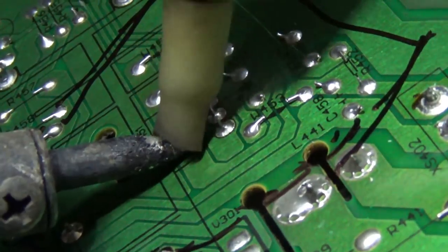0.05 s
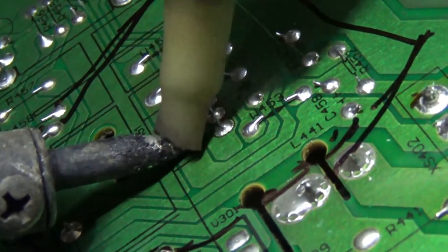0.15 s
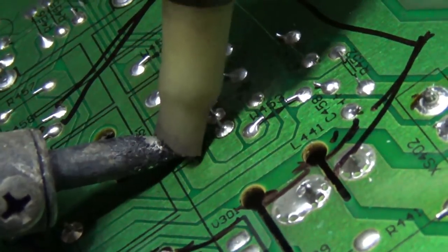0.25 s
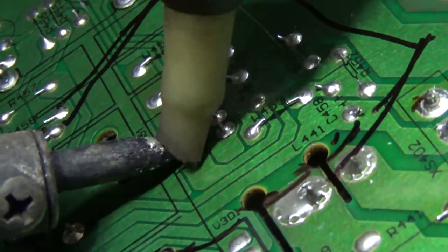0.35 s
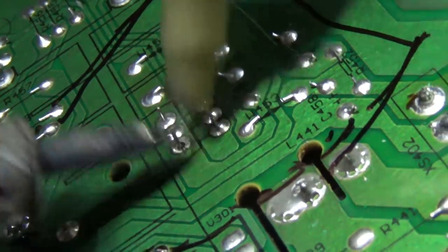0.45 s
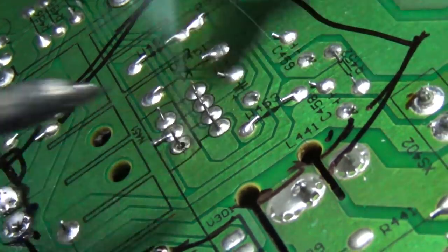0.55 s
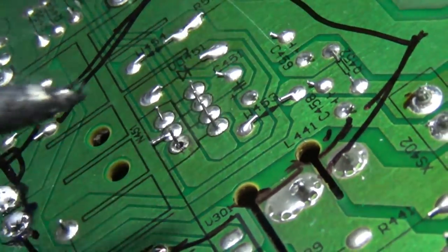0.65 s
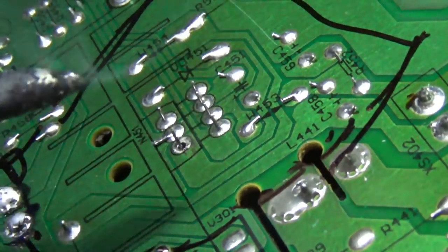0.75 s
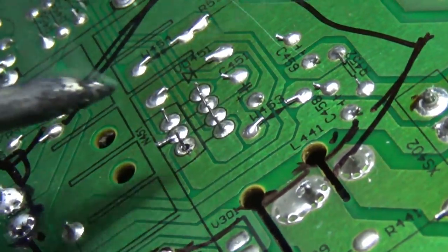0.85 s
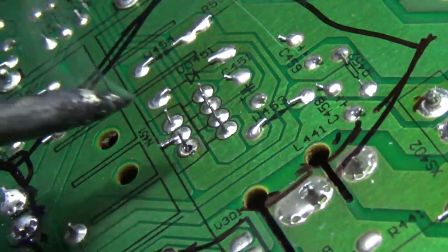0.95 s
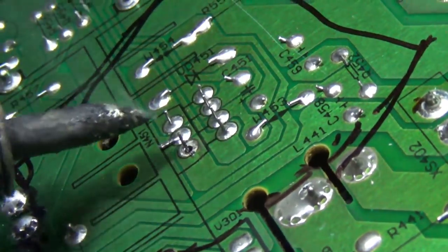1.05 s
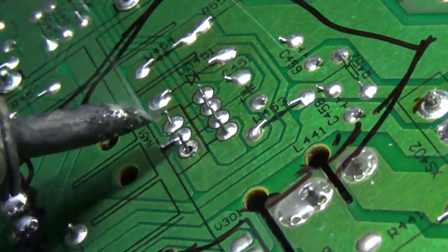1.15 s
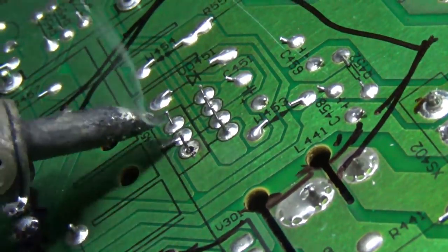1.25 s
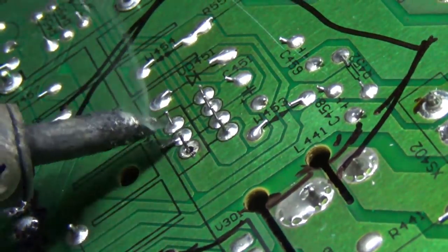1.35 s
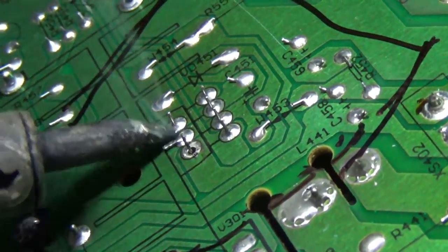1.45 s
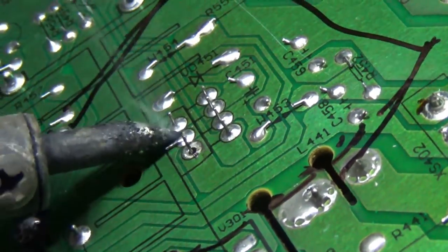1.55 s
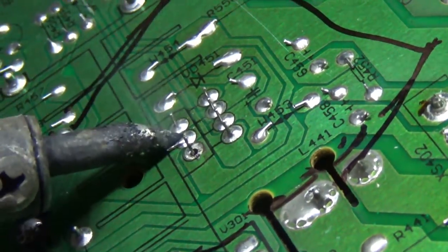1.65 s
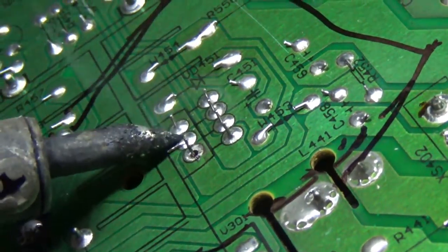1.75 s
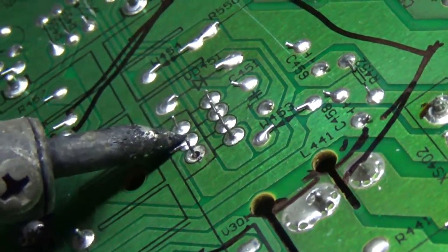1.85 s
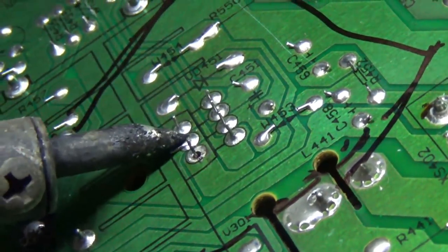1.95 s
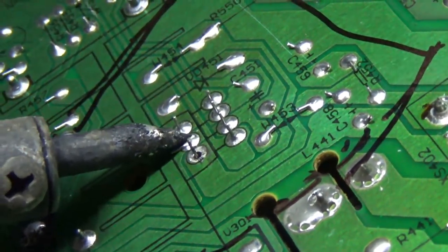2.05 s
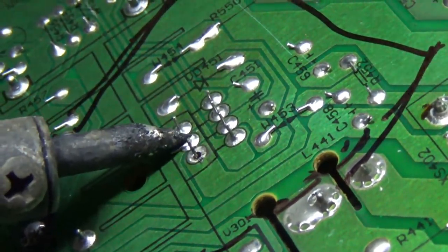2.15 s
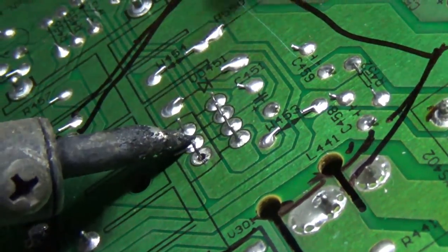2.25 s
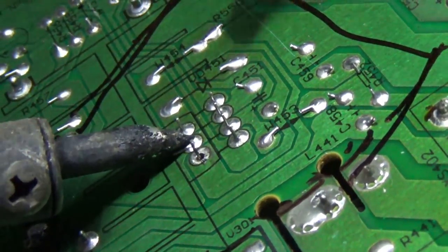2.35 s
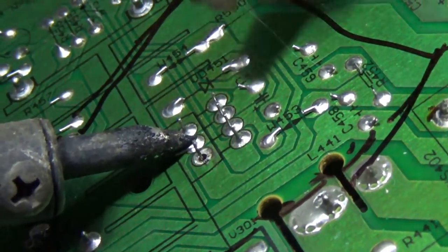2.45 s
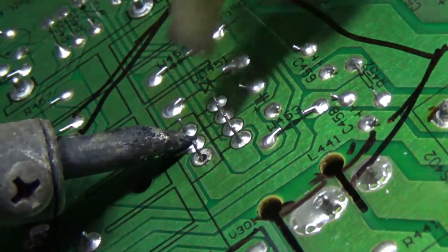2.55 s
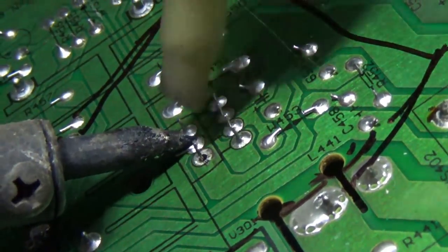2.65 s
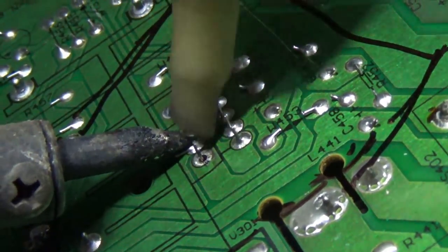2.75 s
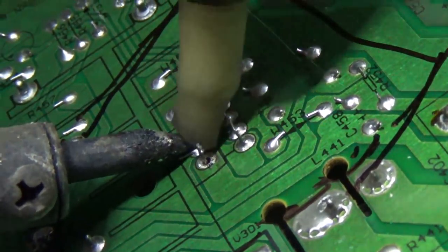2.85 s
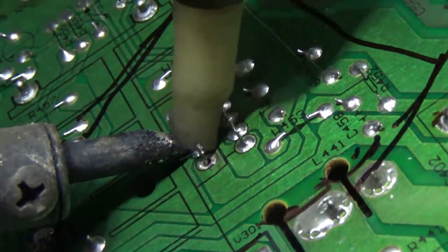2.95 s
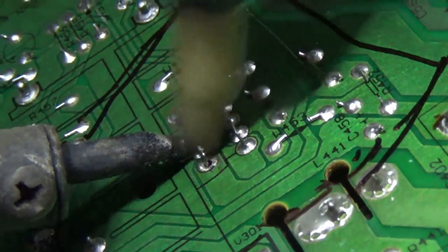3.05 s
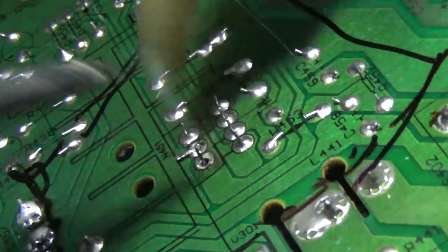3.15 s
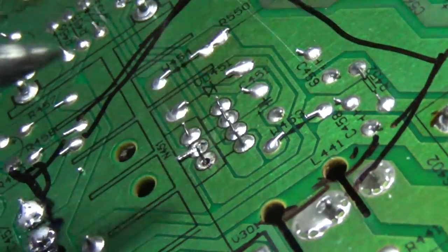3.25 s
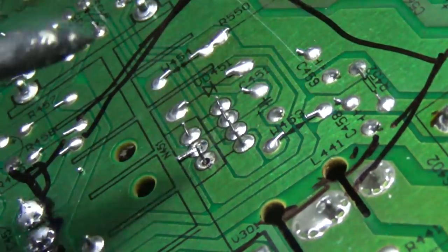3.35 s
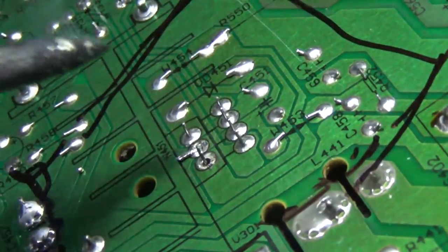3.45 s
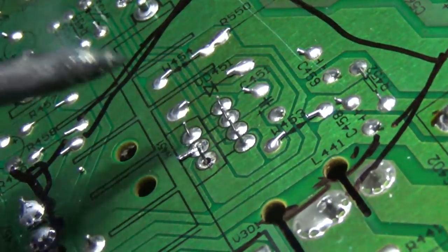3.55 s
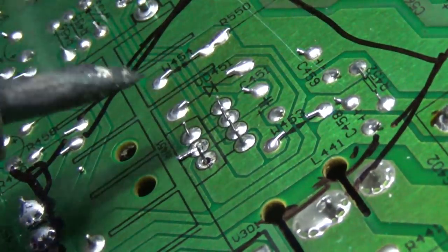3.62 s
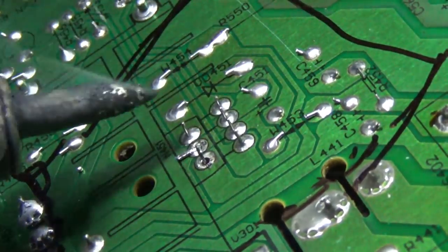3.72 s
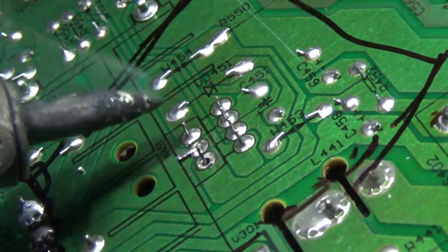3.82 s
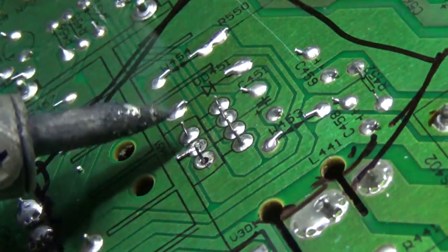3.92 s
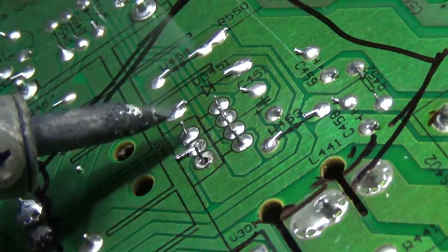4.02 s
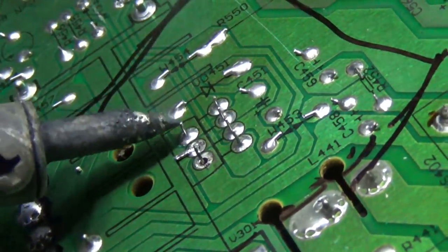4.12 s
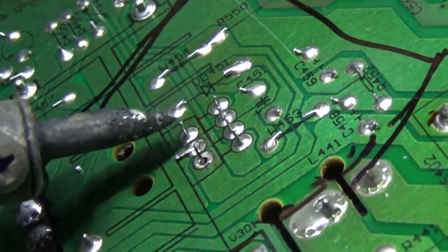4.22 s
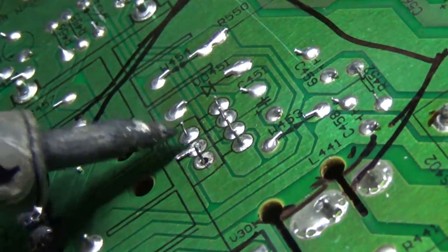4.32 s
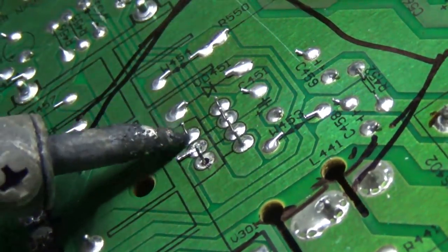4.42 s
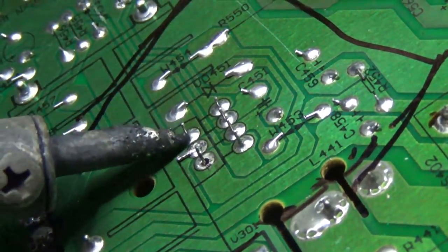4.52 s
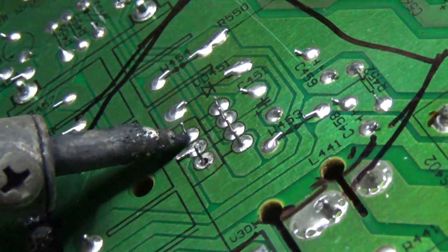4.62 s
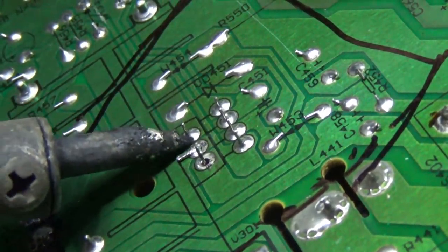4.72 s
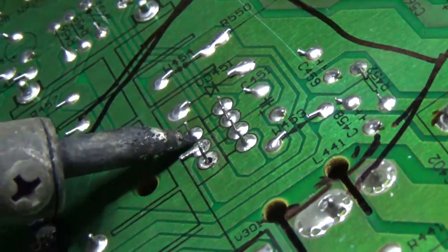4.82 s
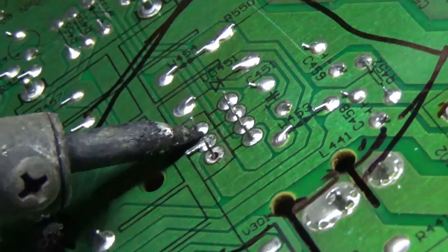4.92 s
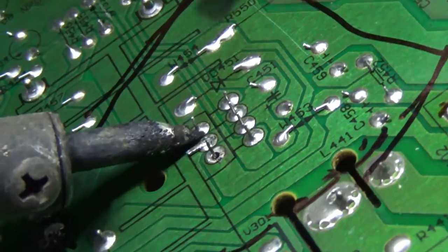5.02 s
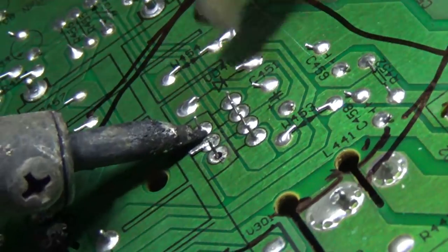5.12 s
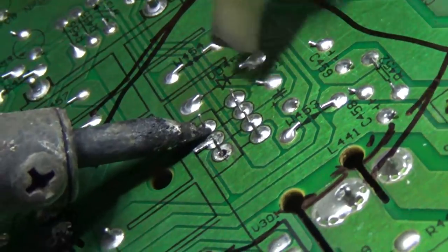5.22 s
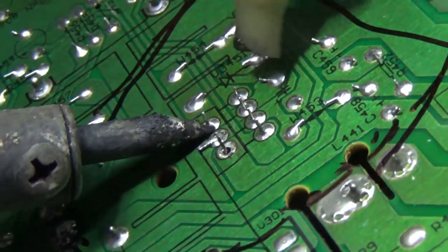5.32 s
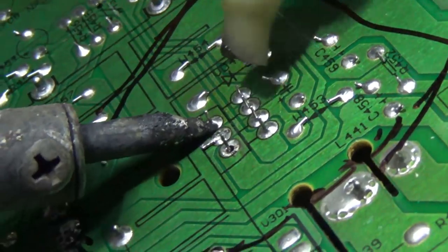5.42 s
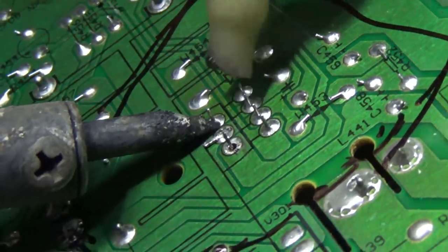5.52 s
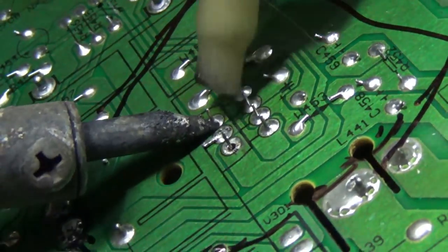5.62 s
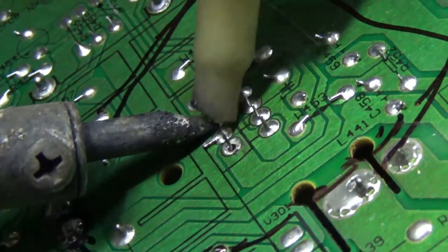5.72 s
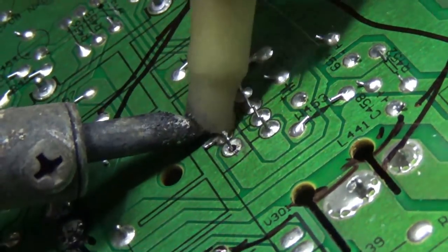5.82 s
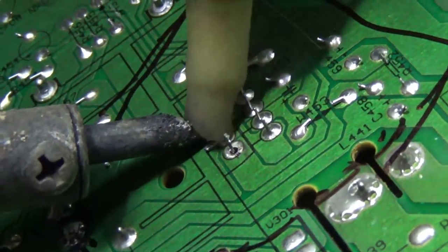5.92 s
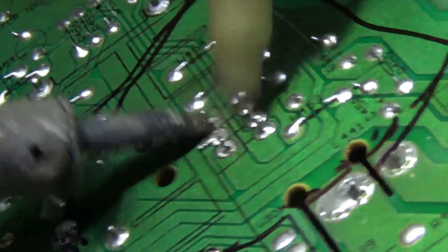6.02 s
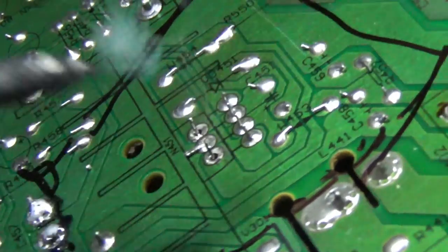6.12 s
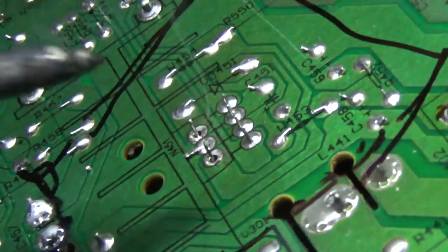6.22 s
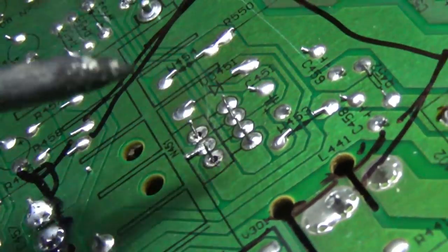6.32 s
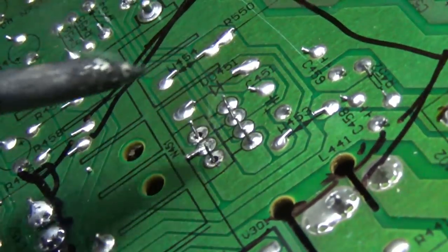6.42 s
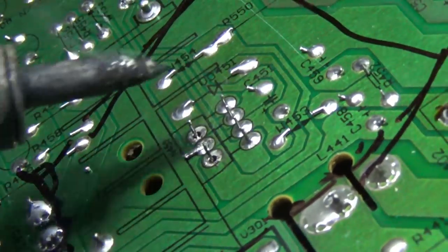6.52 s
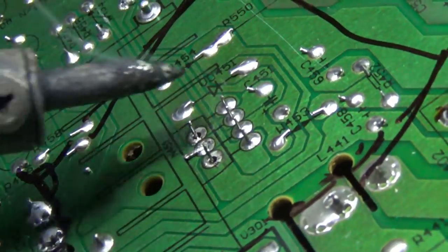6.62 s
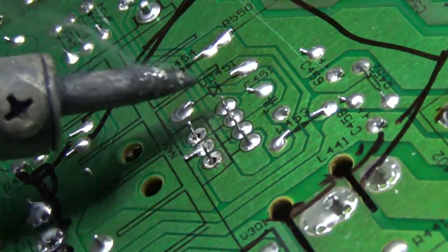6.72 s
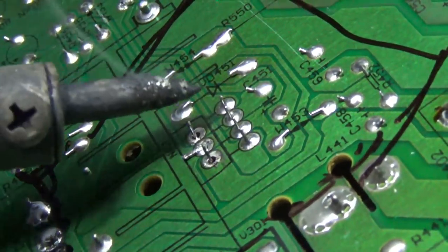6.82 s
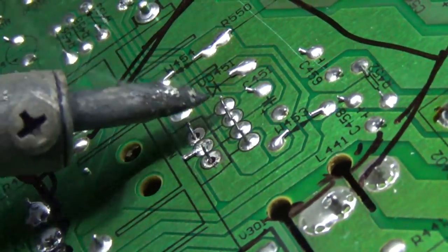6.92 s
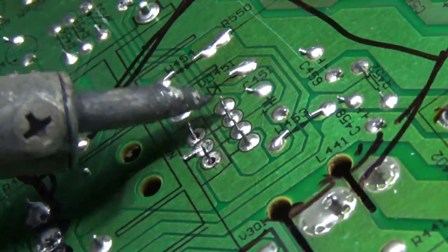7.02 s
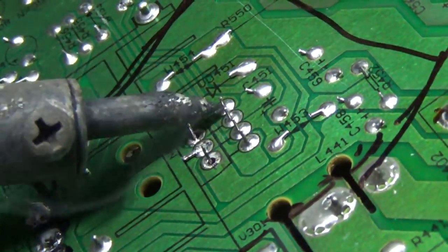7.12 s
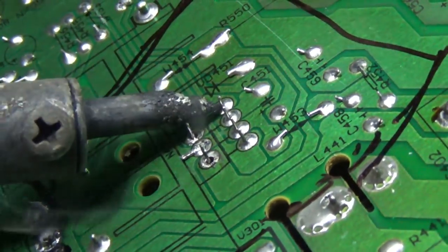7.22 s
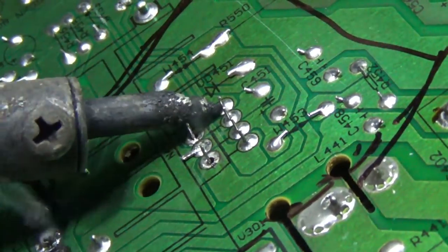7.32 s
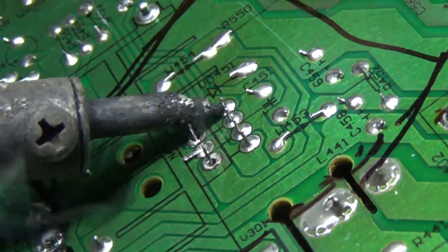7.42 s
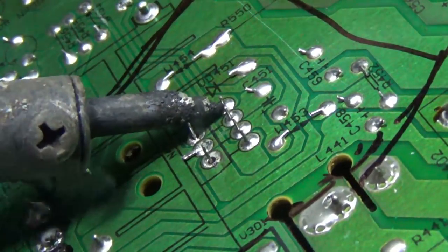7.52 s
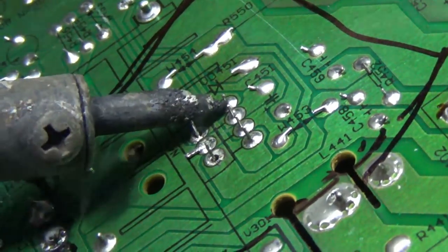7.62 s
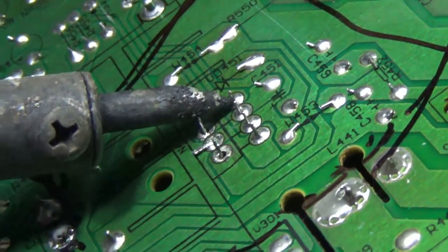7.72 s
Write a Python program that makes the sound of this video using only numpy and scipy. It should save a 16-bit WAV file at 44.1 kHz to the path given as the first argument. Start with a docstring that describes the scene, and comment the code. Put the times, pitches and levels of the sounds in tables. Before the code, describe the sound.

Close to a circuit board in a quiet, softly humming room, a spring-loaded solder pump clicks down, then fires with a very loud double snap and brief gritty shudder. A loose part bounces inside, the plunger hisses back and latches with a bright click, and the knob clicks up. This cycle happens three times, with small handling ticks between. A cricket chirps faintly and steadily in the distance. Close stereo microphone, sounds mostly centred.

```python
"""A quiet room, stereo microphone close to a circuit board: room hum, and a cricket chirping far off throughout.
A solder pump's nozzle lands on the board, a knock of ringing modes; the catch slips, air rushes as filtered
noise, and the piston slams into its stop and shudders. A loose part bounces, the plunger is pushed back with
a hiss of resonant noise, latches and bottoms out, and the knob springs up. Two more shots follow in the same
way, the second after another landing, the third without one; small ticks of handling lie in between."""
import sys
import numpy as np
from scipy import signal
from scipy.fft import rfft, irfft
from scipy.io import wavfile
from scipy.ndimage import uniform_filter1d

SR = 44100
rng = np.random.default_rng(int(sys.argv[2]) if len(sys.argv) > 2 else 0)


def wrap_up_sound(samples):
    """Save the sound to the file named by the first command line argument, as 16-bit audio."""
    columns = np.atleast_2d(samples).T
    # keep every value between -1 and 1, then stretch to whole-number steps
    tamed = np.clip(columns, -1, 1)
    steps = np.round(tamed * 32767).astype(np.int16)
    wavfile.write(sys.argv[1], SR, steps)


def how_loud(loudness_db):
    """Turn decibels into a plain amplitude multiplier (0 dB gives 1, 20 dB gives 10)."""
    steps = np.asarray(loudness_db, float) / 20
    return 10 ** steps


N = 342657  # length [samples]


def evened(x):
    """Scales to rms 1."""
    return x / np.sqrt(np.mean(x ** 2) + 1e-20)


def wander(count, window):
    """Random drift of rms 1, smoothed over a window of samples."""
    return evened(uniform_filter1d(rng.standard_normal(count), window))


def read(points, hz):
    """Reads a spectrum table on a log-frequency axis."""
    f, value = np.transpose(points)
    return np.interp(np.log(hz + 1), np.log(f + 1), value)


def colour(x, points):
    """Filters by a spectrum table."""
    hz = np.fft.rfftfreq(len(x), 1 / SR)
    return irfft(rfft(x) * how_loud(read(points, hz)), len(x))


def resonate(x, hz, width):
    """One resonance of gain 1: a decaying complex pole."""
    r = np.exp(-np.pi * width / SR)
    return 2 * signal.lfilter([1 - r], [1, -r * np.exp(2j * np.pi * hz / SR)], x).real


def resonate_twice(x, hz, width):
    """The same resonance passed twice, for steeper skirts."""
    return resonate(resonate(x, hz, width), hz, width)


def add(mix, s, sound):
    """Mixes a sound in at time s."""
    part = mix[round(s * SR):][:len(sound)]
    part += sound[:len(part)]


def placed(s, sound):
    """A full-length track with one sound at time s."""
    out = np.zeros(N)
    add(out, s, sound)
    return out


# spectrum of the room's hiss and rumble: (frequency [Hz], relative level [dB])
ROOM_SPECTRUM = [(15, -48), (25, -5), (59, -5), (216, -6), (247, -7), (391, -5.5), (460, -7), (652, -7.5),
                 (2140, -13.5), (5790, -18), (7180, -19), (7790, -19.5), (15700, -25.5)]
# two broad hums in the room: (frequency [Hz], width [Hz], level [dB])
ROOM_HUMS = [(232, 82, -75.5), (645, 65, -78.5)]


def room():
    """Steady hiss and rumble with two broad hums that sway a little."""
    hiss = how_loud(-67) * evened(colour(rng.standard_normal(N), ROOM_SPECTRUM))
    hum = sum(how_loud(db) * evened(resonate(rng.standard_normal(N), hz, w)) for hz, w, db in ROOM_HUMS)
    return hiss + how_loud(2.0 * wander(N, 3000)) * hum


# the cricket's drift in tempo: (time [s], lead on an even beat [chirps])
CHIRP_DRIFT = [(0, -.09), (.5, -.085), (1, 0), (1.8, 0), (2.2, .05), (2.7, .2), (3.5, .48), (5.6, .5),
               (6.6, .22), (7.2, .29), (7.8, .43)]
# wing strokes of one chirp: (place [share of the beat], level [dB])
WING_STROKES = [(-.21, -3), (-.04, 0), (.13, -4)]


def cricket():
    """Far off: three wing strokes a chirp, each a slightly fuzzy tone, smeared by distance."""
    chirps_per_s, tone_hz, level_db = 9.2, 7280, -72.5  # the even beat, before the drift; level before the sway
    t = np.arange(N) / SR
    beat = (chirps_per_s * t + np.interp(t, *np.transpose(CHIRP_DRIFT)) + .5) % 1 - .5
    strokes = sum(how_loud(db) * np.exp(-((beat - at) / .065) ** 2) for at, db in WING_STROKES)
    fuzz = evened(resonate(rng.standard_normal(N), tone_hz, 350))
    chirps = evened(np.sin(2 * np.pi * tone_hz * t) + .8 * fuzz) * strokes
    smear = rng.standard_normal(3000) * how_loud(-60 * t[:3000] / 0.037)
    far = chirps + 0.23 * signal.oaconvolve(chirps, smear / np.linalg.norm(smear))[:N]
    return how_loud(level_db + 1.2 * wander(N, 8000)) * far


# modes of the pump's barrel, rod and board: (frequency [Hz], relative level [dB], t60 [s])
BODY_MODES = [(235.3, -32.5, 0.07), (430, -9, 0.035), (649.7, 0, 0.035), (960, -1.5, 0.021),
              (1340, 1, 0.014), (1770, 8.5, 0.0054), (2435, 1, .015), (2690, 2, .012), (3360, 6, 0.0055),
              (3900, 2, 0.0063), (4260, -0.5, 0.0086), (4590, 2.5, 0.01), (5225, 11.5, 0.0038),
              (5800, 1, 0.0053), (6400, 9, 0.0048), (7270, -3, 0.0087), (8500, 11, 0.0018),
              (8450, 16, 0.0009), (8820, -1, 0.0034), (10900, 3, .006), (12960, 3.5, 0.0066),
              (14800, -4.5, .006)]


def blow(db, centre_hz, spread, scatter_db):
    """Rings the modes near the centre; a scatter of small echoes and chatter follows, longer for dull knocks."""
    hz, mode_db, t60 = np.transpose(BODY_MODES)[:, :, None]
    t = np.arange(5000) / SR
    weight_db = mode_db - np.minimum(6 * (np.log2(hz / centre_hz) / spread) ** 2, 34)
    detune, lag = rng.standard_normal((2, *hz.shape))  # each blow lands a little differently
    contact = np.sin(np.pi / 2 * np.minimum(t / (.0002 + .5 / centre_hz), 1)) ** 2
    phase = 2 * np.pi * hz * (1 + .015 * detune) * (t - .75 / centre_hz) + .9 * lag
    ring = contact * (how_loud(weight_db - 60 * t / t60) * np.sin(phase)).sum(0)

    chatter_t60 = .022 * (5000 / centre_hz) ** .45
    chatter = evened(rng.standard_normal(5000) * rng.exponential(1, 5000))
    echoes = chatter * how_loud(-60 * t / chatter_t60) * np.minimum(t / 0.0012, 1)
    after = signal.fftconvolve(ring[:300] * np.hanning(600)[300:], echoes)

    crack = np.diff(rng.standard_normal(5001)) * how_loud(-60 * t / 0.003)  # hard faces meet with a short wide tick
    out = -ring / abs(ring).max() + how_loud(-20.5 + 6 * np.log2(centre_hz / 5000)) * crack
    add(out, 0, how_loud(scatter_db) * after / after[:300].std() / 2)
    return how_loud(db) * out


# Sets of blows below share the columns:
# (delay [s], relative level [dB], centre [Hz], spread [octaves to -6 dB], scatter gain [dB])


def strike(s, db, blows):
    """Plays a set of blows at time s."""
    return sum(placed(s + delay, blow(db + blow_db, *tone)) for delay, blow_db, *tone in blows)


# small ticks and knocks of handling: (time [s], level [dB], centre [Hz], spread [octaves to -6 dB])
HANDLING_TAPS = [(.3948, -27.5, 2640, 1.6), (0.4934, -32, 5100, 2.3), (.5604, -24.5, 2520, 0.17),
                 (.943, -49, 2660, 0.58), (1.6016, -39.5, 810, 0.74), (1.607, -45.5, 392, 1.27),
                 (1.808, -48, 2920, 0.15), (2.966, -56.5, 2850, .2), (3.264, -40.5, 2500, .19),
                 (3.577, -52, 2780, 0.083), (3.976, -48.5, 3340, .4), (4.2615, -44, 703, 0.75),
                 (4.399, -56, 2980, 0.34), (4.523, -57, 900, .44), (4.859, -55, 3980, 1.3),
                 (4.991, -61.5, 304, 1.8), (5.4, -57, 700, 1.1), (5.595, -52.5, 2990, 0.62),
                 (6.229, -44.5, 3500, 0.31), (6.25, -48, 1050, 0.77), (7.19, -55.5, 3940, 1.9),
                 (7.244, -47.5, 2440, 1.76), (7.325, -50, 1500, 2.3), (7.36, -59, 498, .89),
                 (7.505, -51.5, 4030, .25), (7.642, -53.5, 4000, 0.44), (7.671, -39.5, 3460, 0.45),
                 (7.675, -45.5, 760, 1), (7.701, -51, 5050, 1.1)]


def taps():
    """Small blows of handling; faint ones are farther and more smeared."""
    out = np.zeros(N)
    for s, db, hz, spread in HANDLING_TAPS:
        scatter_db = -10 - 0.32 * (db + 48.5)
        add(out, s, blow(db, hz, spread, scatter_db))
    return out


# bounces of a loose part in the barrel after each shot: (time [s], level [dB])
BOUNCES = [(0.71, -44.5), (0.744, -39.5), (.793, -33), (3.351, -50.5), (3.3885, -40.5), (3.444, -33),
           (6.307, -44.5), (6.342, -41), (6.3968, -33.5)]


def rattles():
    """A loose part bounces in the barrel; softer bounces are duller."""
    out = np.zeros(N)
    for s, db in BOUNCES:
        centre_hz = 5300 + 62 * (db + 30)
        add(out, s, blow(db, centre_hz, 0.47, -19.5))
    return out


# the nozzle lands on the board: (time [s], tip click level [dB], board knock level [dB])
NOZZLE_LANDINGS = [(0.3791, -17, -39), (2.8209, -28.5, -36)]
# blows of the tip's click and of the board's knock
TIP_CLICK = [(0, 0, 5500, 1, -18.5)]
BOARD_KNOCK = [(.0006, 0, 1450, 0.66, -8)]


def landings():
    """The hard tip clicks and the board answers with a duller knock."""
    return sum(strike(s, tip_db, TIP_CLICK) + strike(s, board_db, BOARD_KNOCK)
               for s, tip_db, board_db in NOZZLE_LANDINGS)


# resonances of the dragging seal, each passed twice: (frequency [Hz], width of a pass [Hz], level [dB])
SEAL_RESONANCES = [(1500, 1100, -8.5), (2420, 840, -13), (3710, 1600, 4.5), (4750, 2860, 3),
                   (5900, 2300, 2)]
# resonances of air in the nozzle, each passed twice: (frequency [Hz], width of a pass [Hz], level [dB])
NOZZLE_RESONANCES = [(8000, 2500, 16), (10770, 4000, -11), (13320, 3700, -23.5)]


def stroke(s, hiss_db):
    """The seal drags along the barrel in tiny slips while air hisses out of the nozzle."""
    t = np.arange(s[0], s[-1], 1 / SR)
    air_db = -15.5 + 11.5 * np.exp(-((t - s[0]) / 0.071) ** 2)  # against the seal: high at first, then settling
    slips = rng.standard_normal(len(t)) * how_loud(1.6 * wander(len(t), 60))
    seal = sum(how_loud(db) * resonate_twice(slips, hz, w) for hz, w, db in SEAL_RESONANCES)
    air = sum(how_loud(db) * resonate_twice(slips, hz, w) for hz, w, db in NOZZLE_RESONANCES)
    hiss = evened(seal) + how_loud(air_db) * evened(air)
    return placed(s[0], how_loud(np.interp(t, s, hiss_db)) * hiss * signal.windows.tukey(len(t), .05))


# the thumb lets go and the knob springs up against its stop: (time [s], level [dB])
KNOB_RELEASES = [(1.428, -20), (4.0151, -21), (7.092, -22)]
# blows of the knob on its stop
KNOB_STOP = [(0, -1.5, 5800, 0.07, -23), (0, -7, 8850, 0.25, -21), (.0005, -24, 2500, .8, 3),
             (.001, -26, 430, 0.31, -9.5)]


def spring_ups():
    """The knob's short slide swells into the click of the stop and dies at once."""
    slide_s, slide_db, rise_db, fall_db = 0.018, -29.5, 11, 46  # slide level is against the click
    out = np.zeros(N)
    for s, db in KNOB_RELEASES:
        top_db = db + slide_db
        out += stroke([s - slide_s, s, s + slide_s], [top_db - rise_db, top_db, top_db - fall_db])
        out += strike(s, db, KNOB_STOP)
    return out


# pushes on the plunger up to the nudge, one table a cocking: (time [s], hiss level [dB])
PUSHES = [
    [(1.04, -84), (1.048, -63), (1.058, -50.5), (1.088, -51.5), (1.112, -58.5), (1.198, -49.5), (1.23, -58)],
    [(3.685, -86), (3.699, -54), (3.719, -50.5), (3.755, -53.5), (3.765, -49.5), (3.823, -48), (3.84, -55)],
    [(6.664, -85), (6.678, -58.5), (6.7, -52.5), (6.736, -59), (6.76, -50.5), (6.878, -50.5),
     (6.892, -52.5)],
]
# the plunger nudges the catch, latches, then bottoms out, one row a cocking: (time [s], level [dB])
CATCH_NUDGES = [(1.24, -30), (3.8468, -27), (6.905, -28)]
CATCH_LATCHINGS = [(1.257, -16), (3.8636, -15.5), (6.924, -16.5)]
PLUNGER_BOTTOMINGS = [(1.285, -39.5), (3.889, -36.5), (6.956, -43)]
# blows of a nudge, a latching and a bottoming
NUDGE_BLOWS = [(0, -3, 3330, 0.35, -9), (0, -7, 8000, 0.7, -22)]
LATCH_BLOWS = [(0, 0, 5900, 0.84, -15), (0, -11, 2380, 0.46, -14.5), (.0003, -14, 13000, 0.73, -18),
               (.003, -14, 5700, .65, -30)]
BOTTOM_BLOWS = [(0.0013, 0, 1150, 1, -16.5)]


def cockings():
    """The plunger hisses down, nudges the catch, latches and bottoms out."""
    out = np.zeros(N)
    for push, nudge, latching, bottoming in zip(PUSHES, CATCH_NUDGES, CATCH_LATCHINGS, PLUNGER_BOTTOMINGS):
        s, hiss_db = np.transpose(push)
        s = [*s, latching[0], bottoming[0], bottoming[0] + 0.04]
        hiss_db = [*hiss_db, -51, -52.5, -81]  # at the latch, at the bottom, faded out
        out += stroke(s, hiss_db)
        out += strike(*nudge, NUDGE_BLOWS)
        out += strike(*latching, LATCH_BLOWS)
        out += strike(*bottoming, BOTTOM_BLOWS)
    return out


# spectrum of the shudder at its start: (frequency [Hz], relative level [dB])
SHUDDER_SPECTRUM = [(88, -36), (150, -8), (254, -6.5), (484, -11), (637, -4), (1020, -3), (1790, -2.5),
                    (3350, -6), (5050, -2), (6640, -11.5), (10800, -11.5), (16000, -29.5)]
# how fast the shudder dies: (frequency [Hz], time to fall 85 dB [s])
SHUDDER_DECAY = [(80, 0.35), (300, 0.22), (1000, 0.18), (3000, 0.18), (6000, .2), (10000, 0.17),
                 (16000, 0.2)]
# board and bench resonances, each passed twice: (frequency [Hz], width of a pass [Hz], relative level [dB])
BENCH_RESONANCES = [(89, 66, -23), (235.5, 35, -17), (650, 73, -20), (1500, 120, -15.5), (1770, 290, -12.5),
                    (2333, 100, -16.5)]


def shudder():
    """The barrel, spring and bench shake after the end stop: gritty noise that dies faster as it goes."""
    grit = rng.standard_normal(16384) * how_loud(2.0 * wander(16384, 60))
    bench = sum(how_loud(db) * evened(resonate_twice(grit, hz, w)) for hz, w, db in BENCH_RESONANCES)
    shake = evened(colour(grit, SHUDDER_SPECTRUM)) + bench
    hz, t, z = signal.stft(shake, SR, nperseg=256, noverlap=192)
    age = t / read(SHUDDER_DECAY, hz)[:, None]
    tail = signal.istft(z * how_loud(-25 * age - 60 * age ** 2), SR, nperseg=256, noverlap=192)[1]
    return tail * np.minimum(np.arange(len(tail)) / SR / 0.0026, 1)


# shots: (time the catch lets go [s], catch [dB], air rush [dB], end stop [dB], shudder [dB])
PUMP_SHOTS = [(0.5153, -8, -23, -4.5, -30.5), (3.1604, -7.5, -23.5, -3, -30), (6.1076, -6.5, -24, -5, -29)]
# blows of the slipping catch and of the end stop
CATCH_BLOWS = [(0, 1, 8000, 0.072, -17), (.002, -3.5, 6400, 0.3, -31), (.0055, -8, 8500, .8, -16)]
STOP_BLOWS = [(0, 0.5, 3900, 0.43, -22), (.0003, -16.5, 1770, 0.31, -9), (.0004, -17.5, 8566, .5, -8.5),
              (.0034, -13, 2600, 1.8, -21.5)]
# spectrum of the air rush: (frequency [Hz], relative level [dB])
RUSH_SPECTRUM = [(180, -39.5), (300, -13), (3700, -5.5), (4910, -14), (6300, -2), (6960, -6), (12300, -6.5),
                 (16000, -20.5)]


def shots():
    """The catch slips, the piston flies back sucking air, then slams into the end stop and shudders."""
    travel_s = .0117  # from catch to end stop
    out = np.zeros(N)
    for s, catch_db, rush_db, stop_db, shudder_db in PUMP_SHOTS:
        out += strike(s, catch_db, CATCH_BLOWS)
        gusts = rng.standard_normal(1024) * rng.exponential(1, 1024) ** .5
        rush = evened(colour(gusts, RUSH_SPECTRUM))[:round(.82 * travel_s * SR)]
        add(out, s + .001, how_loud(rush_db) * rush * signal.windows.tukey(len(rush), .5))
        out += strike(s + travel_s, stop_db, STOP_BLOWS)
        add(out, s + travel_s, how_loud(shudder_db) * shudder())
    return out


# side against mid for the room and for the near sounds: (frequency [Hz], level [dB])
ROOM_WIDTH = [(60, -30), (150, -21), (380, -12.5), (950, -6.5), (2380, -9), (5980, -15), (15000, -28)]
NEAR_WIDTH = [(60, -27), (150, -29), (380, -14.5), (950, -15), (2380, -13), (5980, -18.5), (15000, -24)]


def scene():
    """Pump and cricket sit in the middle with a little scattered side; the room is wider."""
    middle = cricket() + taps() + rattles() + landings() + spring_ups() + cockings() + shots()
    spread = rng.standard_normal(900) * how_loud(-60 * np.arange(900) / SR / .02)  # reflections that differ left and right
    scattered = signal.oaconvolve(middle, spread / np.linalg.norm(spread))[:N]
    side = colour(scattered, NEAR_WIDTH) + colour(room(), ROOM_WIDTH)
    mid = middle + room()
    return np.array([mid + side, mid - side])


def band_limit(x):
    """A steep low-pass at the top of the band."""
    return signal.sosfilt(signal.butter(12, 16830, fs=SR, output="sos"), x)


def record(dry):
    """The microphone drops the deepest bass and the highest treble."""
    treble_cut = signal.oaconvolve(dry, signal.firwin(301, 15950, fs=SR)[None], "same")
    finished = signal.lfilter(*signal.butter(1, 40, "high", fs=SR), treble_cut)
    return band_limit(finished)


dry = scene()
out = record(dry)
wrap_up_sound(out)
```